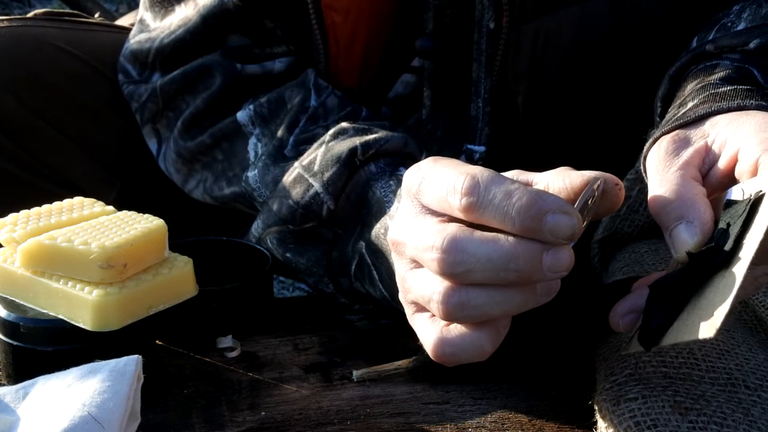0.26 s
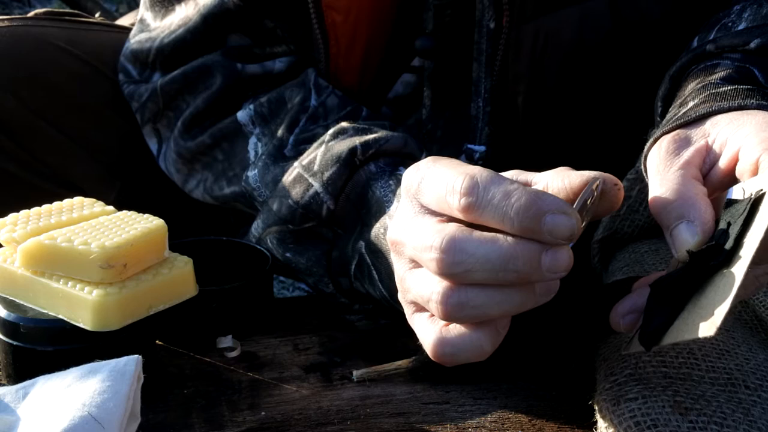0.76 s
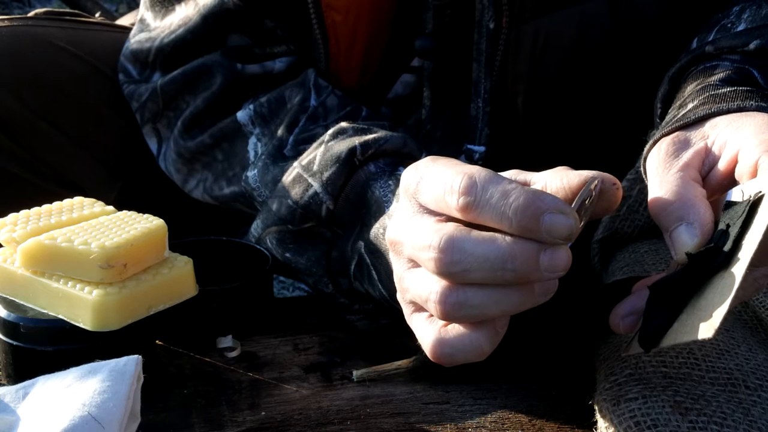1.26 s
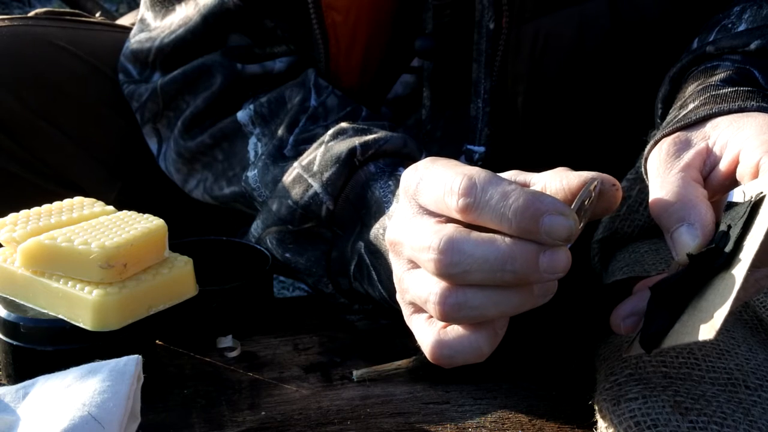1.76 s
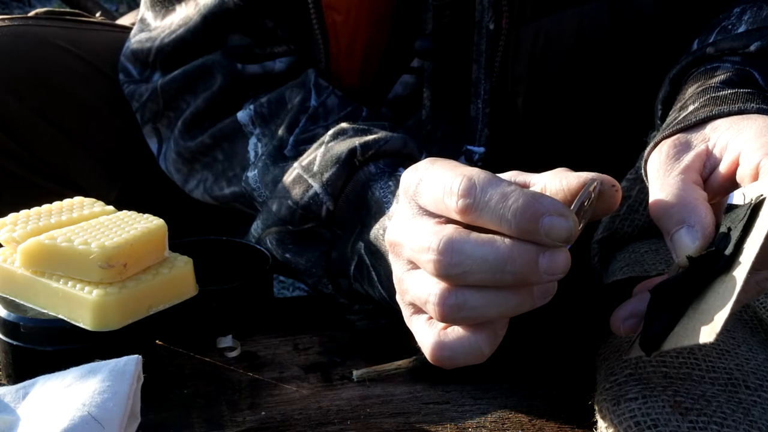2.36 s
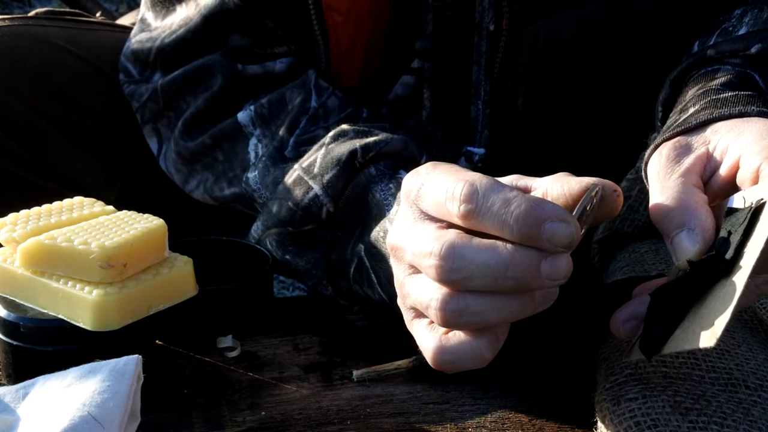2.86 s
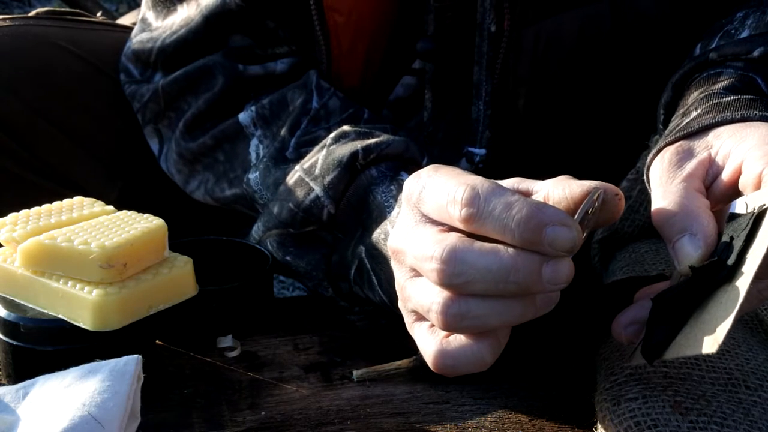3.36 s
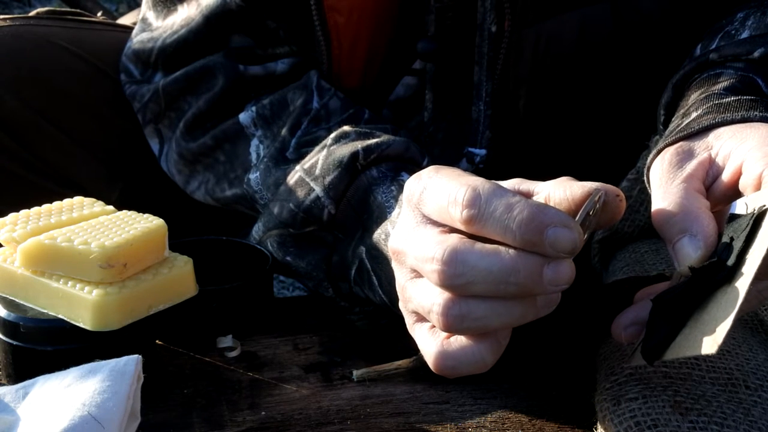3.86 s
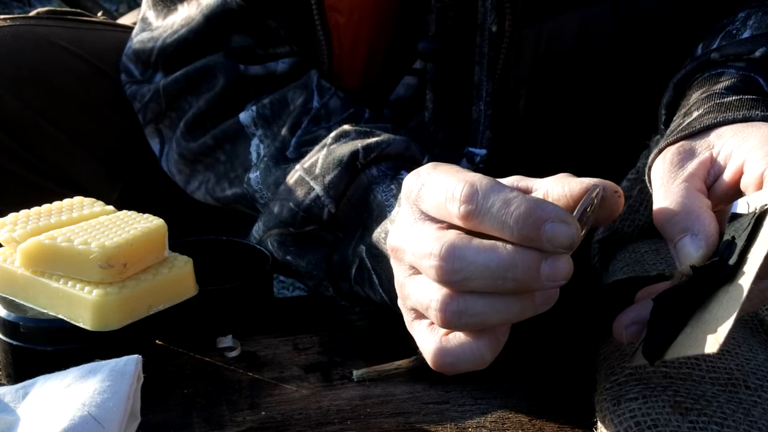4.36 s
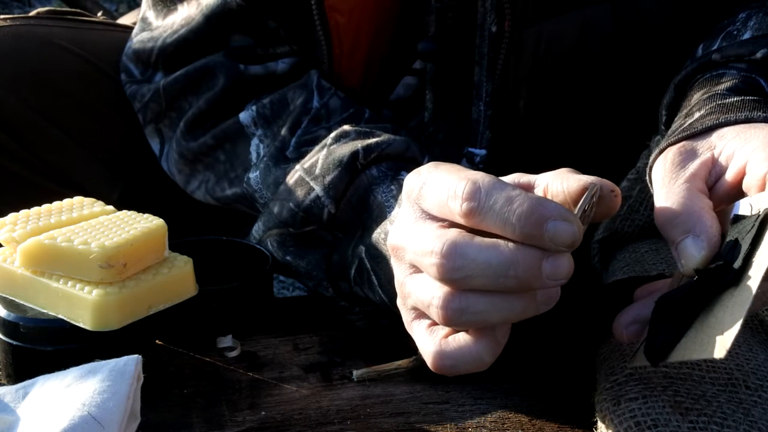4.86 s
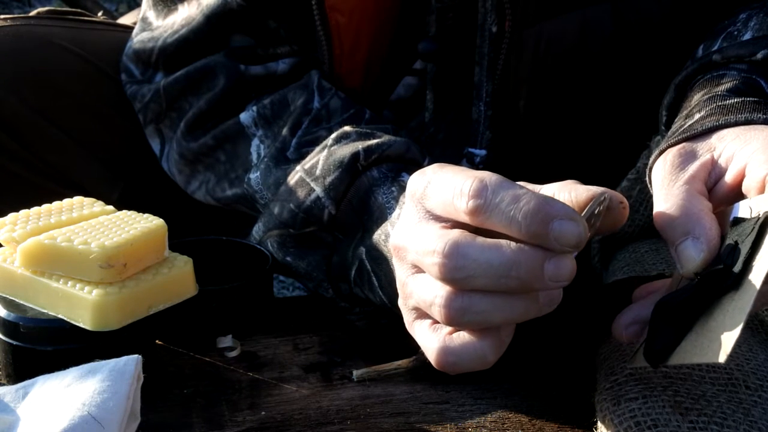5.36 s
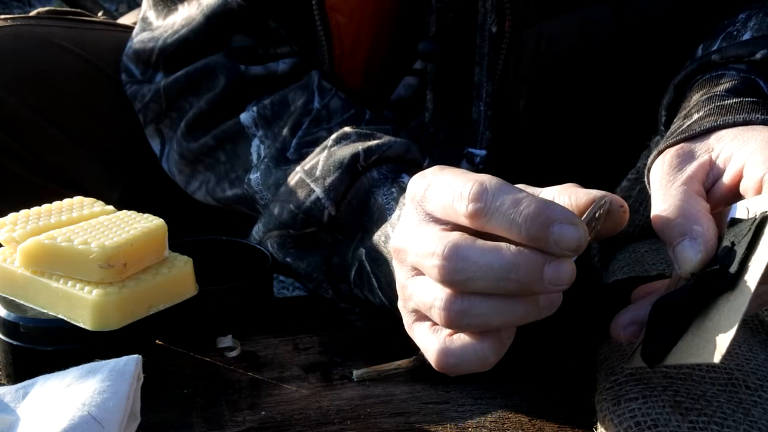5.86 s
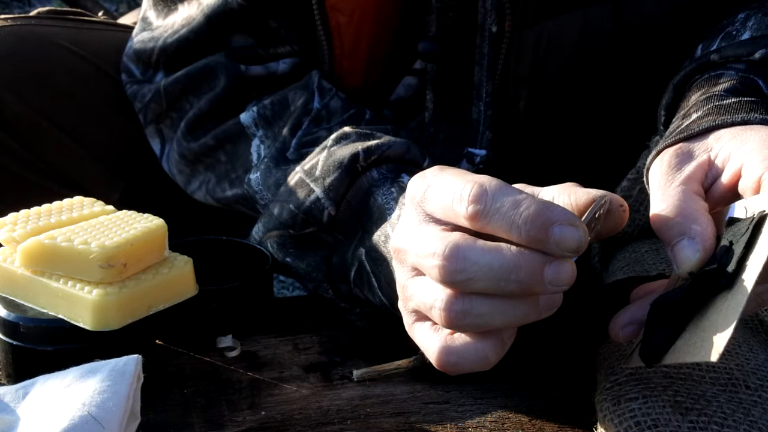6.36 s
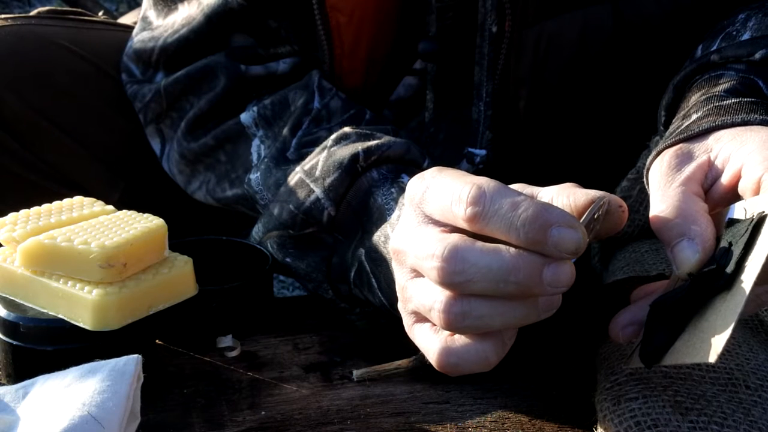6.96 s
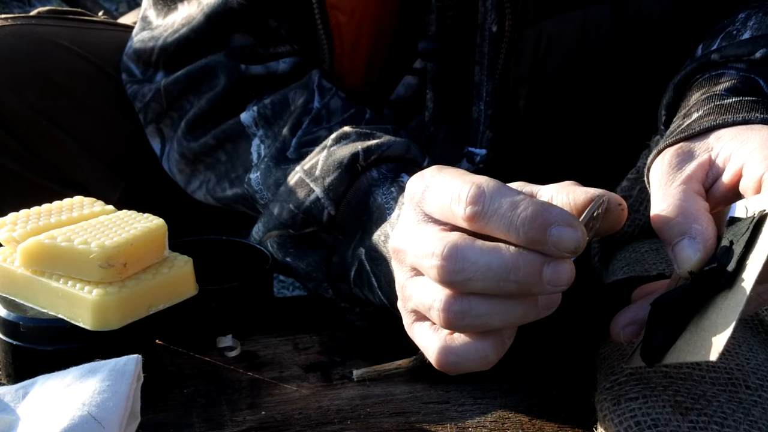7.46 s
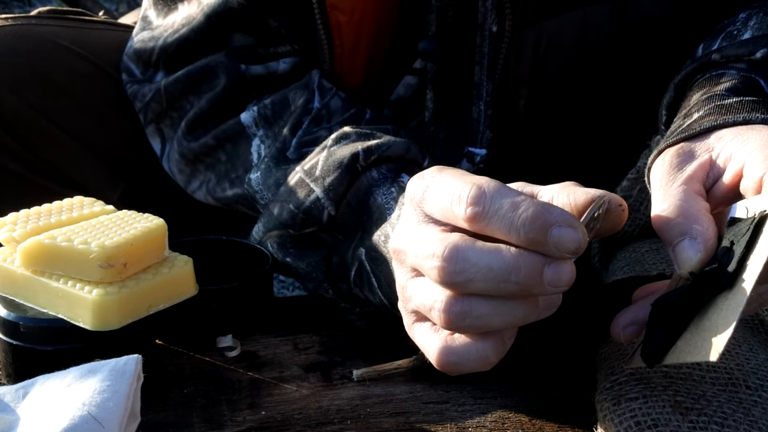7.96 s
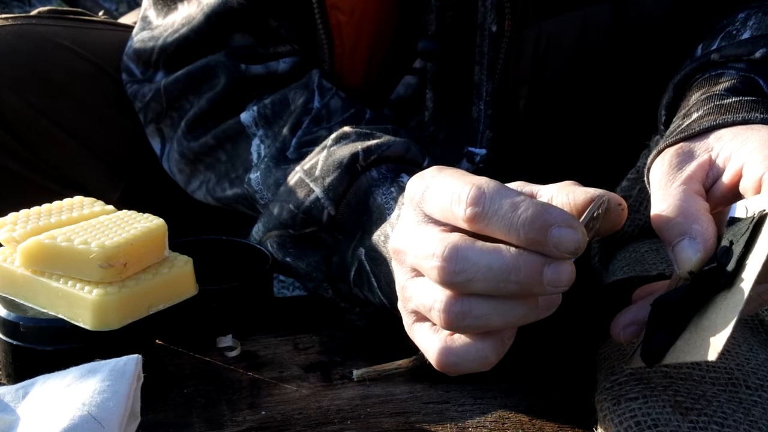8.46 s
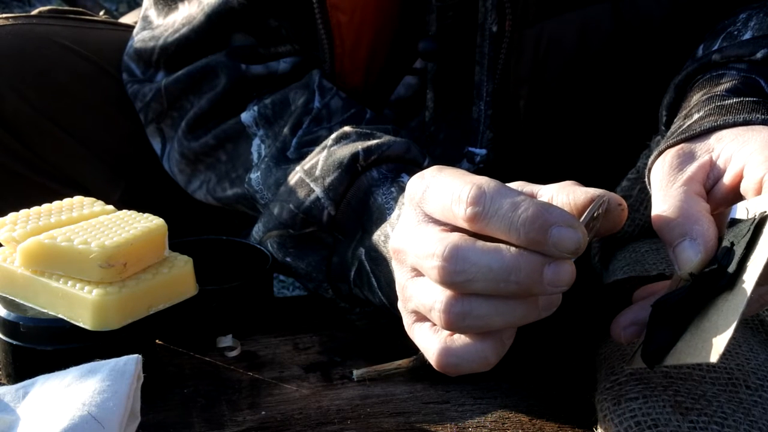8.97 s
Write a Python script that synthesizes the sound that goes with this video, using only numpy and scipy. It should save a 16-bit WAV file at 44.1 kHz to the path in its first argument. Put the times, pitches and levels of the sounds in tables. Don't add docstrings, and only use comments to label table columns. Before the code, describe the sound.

A wood fire outdoors snaps with sharp, scattered pops and tiny ticks over a low distant traffic rumble, with very faint bird calls.

```python
import sys
import numpy as np
from scipy import signal
from scipy.fft import rfft, irfft, next_fast_len
from scipy.io import wavfile
from scipy.ndimage import uniform_filter1d

SR = 44100
rng = np.random.default_rng(int(sys.argv[2]) if len(sys.argv) > 2 else 0)


def wav_record(signal):
    frames = np.transpose(np.atleast_2d(signal))
    bounded = np.clip(frames, -1, 1)
    quanta = np.round(bounded * 32767).astype(np.int16)
    wavfile.write(sys.argv[1], SR, quanta)


def field_ratio(decibels):
    return 10 ** (np.asarray(decibels, dtype=float) / 20)


N = 406161
TIME = np.arange(N) / SR
TOP_HZ = 15850


def unit(x):
    return x / np.sqrt(np.mean(x ** 2))


def peak(x, db):
    return field_ratio(db) * x / np.abs(x).max()


def shape(table, hz):
    f, db = np.transpose(table)
    return field_ratio(np.interp(np.log(hz + 1), np.log(f), db))


def ring(x, hz, width_hz):
    return signal.lfilter(*signal.iirpeak(hz, hz / width_hz, fs=SR), x)


def walk(rate):
    k = int(SR / rate)
    steps = np.repeat(rng.standard_normal(N // k + 1), k)
    return uniform_filter1d(uniform_filter1d(steps, k), k)[:N]


def add(out, s, x):
    i = int(s * SR)
    out[..., i:i + x.shape[-1]] += x[..., :out.shape[-1] - i]


def ports(x, pan_db):
    lag_s = .000034
    size = next_fast_len(len(x) + 16)
    hz = np.fft.rfftfreq(size, 1 / SR)
    late = irfft(rfft(x, size) * np.exp(-2j * np.pi * hz * lag_s), size)
    return np.array([x * field_ratio(pan_db / 2), late[:len(x)] * field_ratio(-pan_db / 2)])


# frequency in Hz, gain in dB.
YARD_COLOUR = [(2060, -38), (3500, 1.5), (5550, -6), (6650, -3), (8060, -1), (9780, 0.5), (13300, -4.5),
               (15500, -11)]


def pop(crack_db, crack_hz, log_db, tail_db):
    t = np.arange(next_fast_len(SR // 3)) / SR
    log_hz = 2850 * (crack_hz / 8950) ** 0.28
    snap = (t == 0) + .12 * rng.standard_normal(len(t)) * np.exp(-t / .0004)
    crack = ring(ring(snap, crack_hz, 4200.), crack_hz, 6000.)
    bark = ring(ring(snap, 7100.0, 1200.0), 5800.0, 2800.0)
    crack = peak(crack + 0.43 * bark, crack_db + 5.5)
    log = peak(ring(ring(snap, log_hz, 1670.0), log_hz, 1900.0), log_db + 1.0)
    out = ports(crack, -3.3)
    add(out, .0004, ports(log, -3.5))
    bounce = field_ratio(-18.) * out[:, :SR // 100]
    bounce = bounce + field_ratio(-8.) * ports(np.roll(log, 18)[:SR // 100], -2.5)
    add(out, .00123, bounce)
    hiss = rng.standard_normal((2, 2, len(t)))
    hz = np.fft.rfftfreq(len(t), 1 / SR) * (8800 / crack_hz) ** 0.51
    high = unit(irfft(rfft(hiss[0]) * shape(YARD_COLOUR, hz), len(t)))
    low = unit(ring(hiss[1], log_hz, 1860.0))
    high_decay = field_ratio(-29.0) * np.exp(-t / .005) + field_ratio(-27.5) * np.exp(-t / 0.028)
    low_decay = field_ratio(-13.5) * np.exp(-t / 0.0041) + field_ratio(-28.0) * np.exp(-t / 0.034)
    tail = field_ratio(crack_db) * high * high_decay + field_ratio(log_db) * low * low_decay
    onset = np.minimum(t / .001, 1)
    return out + field_ratio(tail_db) * onset * tail


# start in seconds, crack level in dB, crack
# frequency in Hz, log ring level in dB, scattered tail level in dB.
BURSTS = [(1.2009, 5.5, 8600, -9, 4), (1.3594, -13.5, 8800, -17.5, 1.5), (1.7375, 2.5, 8450, -7, 3.5),
          (2.8911, -1.5, 9400, -6.5, 1), (3.5416, -27, 8400, -30.5, 0), (4.024, -28.5, 8800, -37, -2),
          (4.3132, -21.5, 9200, -36, -26), (5.8331, 7.5, 9550, -6, 0), (6.388, -12.5, 7840, -19, -11),
          (6.3882, -21.5, 7000, -18, 9), (6.8985, -3.5, 7240, -4.5, -5), (8.904, -21, 7700, -28.5, -1.5)]
# start in seconds, crack level in dB,
# crack frequency in Hz, log ring level in dB.
SMALL_TICKS = [(0.3485, -25, 8950, -27.5), (0.9046, -39, 6910, -39), (1.738, -4.5, 7340, -22),
               (1.5776, -30, 10140, -41), (1.6402, -35, 9630, -43), (1.6599, -23, 8100, -29.5),
               (2.5467, -23, 9400, -25), (2.8617, -29, 7800, -46), (4.5317, -33, 8940, -50),
               (4.5571, -33, 8500, -33.5), (4.7194, -43, 8880, -47), (5.5118, -28, 9550, -35.5),
               (5.7647, -29.5, 8380, -29), (5.8759, -30, 9090, -48), (6.1894, -42, 9360, -49),
               (6.2031, -36, 8990, -41), (7.8228, -27.5, 9800, -27), (7.989, -35.5, 8490, -38),
               (8.0308, -44, 9730, -40), (8.4201, -25.5, 10100, -29.5), (8.5022, -50, 8300, -26.5),
               (8.5825, -26, 8800, -25.5), (9.0534, -36, 6800, -43)]


def fire():
    out = np.zeros((2, N))
    tick_tail_db = 3.5
    for s, *settings in BURSTS + [(*tick, tick_tail_db) for tick in SMALL_TICKS]:
        add(out, s, pop(*settings))
    return out


# start in seconds, level in dB, frequency in Hz.
LOG_KNOCKS = [
    (1.2, -7, 1300),
    (1.74, -18, 3500),
    (2.89, -11, 1730),
    (5.83, -17, 2150),
    (1.2, -31, 3450),
    (6.389, -4, 880),
    (6.389, -14, 320),
    (6.9, -5, 1160),
    (6.9, -9, 3600),
]


def knocks():
    out = np.zeros((2, N))
    t, starts = np.arange(SR // 30) / SR, np.array(BURSTS)[:, 0]
    for s, db, hz in LOG_KNOCKS:
        t60_s = 0.0053 * (hz / 1000) ** -1.04
        knock = -field_ratio(db) * np.sin(2 * np.pi * hz * t) * 1000 ** (-t / t60_s)
        burst_s = starts[np.abs(starts - s).argmin()]
        add(out, burst_s + 0.00029, ports(knock, -0.91))
    return out


# burst start in seconds, echo level in dB.
BRIGHT_ECHOES = [
    (1.7375, -16),
    (2.8909, -22),
    (5.8331, -14),
]


def wall():
    delay_s, spread_s, bright_hz = 0.0062, .0018, 11300.
    out, t = np.zeros((2, N)), np.arange(SR // 50) / SR
    for s, db in BRIGHT_ECHOES:
        bright = rng.standard_normal((2, len(t)))
        bright = ring(ring(bright, bright_hz, 3800.), bright_hz, 3800.)
        add(out, s, field_ratio(db) * np.exp(-((t - delay_s) / spread_s) ** 2) * unit(bright))
    return out


def housing(x):
    x = x - 0.8 * ring(x, 3900.0, 900.0)
    x = x - 0.37 * ring(x, 4940.0, 1830.0)
    return signal.sosfilt(signal.butter(4, 13600., fs=SR, output="sos"), x)


def motor(load_db):
    level = field_ratio(-45.5 + load_db + 1.04 * walk(7.0))
    hz = 111. + 1.12 * walk(4.0)
    return np.sqrt(2) * level * np.sin(2 * np.pi * np.cumsum(hz) / SR)


# time in seconds, heavy vehicle drawing near in dB, motor load in dB.
TRAFFIC = [(0, -2, 5), (1.3, -2.5, 3.5), (2.1, 0, -4.5), (2.8, -2, 4.5), (3.5, -1.5, -7), (4.2, -2.5, 0),
           (5.5, -2.5, -5), (6.1, -2.5, 5), (6.7, 0, 4), (7.2, 1.5, 4.5), (7.9, -1, -3.5), (8.6, 1.5, -10),
           (9.21, 2, 0.5)]
# frequency in Hz, density in dB per Hz.
ROAR_SPECTRUM = [(22, -49), (42, -15.5), (60, 0), (110, -0.5), (224, -2), (342, -12.5), (550, -4.5),
                 (800, -3), (1050, -5), (1460, -18.5), (2720, -32), (3950, -34), (8570, -37.5),
                 (15600, -50)]
# frequency in Hz, gain in dB.
STEREO_WIDTH = [(30, -30), (200, -19.5), (600, -17.5), (1200, -11), (2500, -2), (5000, 1.5), (16000, -1)]


def road():
    s, *columns = np.transpose(TRAFFIC)
    heavy, load = (np.interp(TIME, s, c) for c in columns)
    rumble, tyres, hiss = -0.47 + 0.3 * heavy, 1.68 + 0.12 * heavy, -3
    size = next_fast_len(N)
    hz = np.fft.rfftfreq(size, 1 / SR)
    mid, side = rfft(rng.standard_normal((2, size))) * shape(ROAR_SPECTRUM, hz) * (hz < TOP_HZ)
    side = side * shape(STEREO_WIDTH, hz)
    pair = np.array([mid + side, mid - side])
    octave, out = np.log2(hz + 1), 0
    for centre in np.arange(4, 15):
        band = np.cos(np.pi / 2 * np.clip(octave - centre, -1, 1)) ** 2
        if centre < 8.5:
            swell = rumble
        elif centre < 9.5:
            swell = heavy
        elif centre < 11.5:
            swell = tyres
        else:
            swell = hiss
        flicker = 0.56 * walk(2.473) + 1.42 * walk(14.0)
        out = out + field_ratio(swell + flicker) * irfft(pair * band, size)[:, :N]
    roar = field_ratio(-32.5) * unit(out) * field_ratio(np.array([[-.2], [.2]]))
    return roar + motor(load)


def tone(t0, t1, hz0, hz1, db, wobble, flutter):
    u = np.linspace(0, 1, int((t1 - t0) * SR))
    i = rng.integers(N // 2)
    hz = (hz0 + (hz1 - hz0) * u) * (1 + wobble[i:i + len(u)])
    swell = np.minimum(8 * u, 1) * np.sqrt(1 - u ** 2)
    return field_ratio(db + flutter[i:i + len(u)]) * swell * np.sin(2 * np.pi * np.cumsum(hz) / SR)


# start in seconds, end in seconds, first and last frequency in Hz, level in dB.
BIRD_CALLS = [(.5, .57, 8600, 8450, -65), (5.14, 5.17, 5400, 4800, -67), (5.3, 5.39, 7800, 6900, -70),
              (5.59, 5.635, 5700, 4400, -63), (5.97, 6.15, 5640, 5520, -64), (5.97, 6.11, 5350, 5200, -68),
              (6.242, 6.336, 7350, 7260, -67), (6.348, 6.37, 7440, 7460, -63),
              (6.29, 6.35, 3200, 3700, -67), (6.443, 6.53, 4140, 4100, -61), (8.25, 8.33, 4550, 4560, -66),
              (8.03, 8.1, 3700, 3650, -66), (8.46, 8.543, 3500, 3400, -61), (8.63, 8.724, 3530, 3240, -65),
              (9.07, 9.12, 3500, 3400, -64), (9.163, 9.21, 3400, 3370, -66)]


def birds():
    calls = np.zeros(N)
    for row in BIRD_CALLS:
        add(calls, row[0], tone(*row, .007 * walk(400.0), 3.0 * walk(90.0)))
    t = np.arange(SR // 5) / SR
    trees = rng.standard_normal(len(t)) * np.exp(-t / .035)
    blurred = signal.fftconvolve(calls, trees / np.linalg.norm(trees))[:N]
    return np.sqrt(2) * (calls + field_ratio(-5.) * blurred)


# start in seconds, end in seconds, frequency in Hz, level in dB.
GEAR_WHINES = [
    (4.394, 6.8, 426.3, -52),
    (6.4, 7.51, 520.4, -44.5),
]


def gears():
    out = np.zeros(N)
    for t0, t1, hz, db in GEAR_WHINES:
        add(out, t0, tone(t0, t1, hz, hz, db, 0.0088 * walk(30.0), 3.5 * walk(15.0)))
    return np.sqrt(2) * out


def scene():
    front = fire() + knocks() + wall()
    return housing(front) + road() + birds() + gears()


# start in seconds, drop in dB, recovery time in seconds.
GAIN_DROPS = [
    (0, -7, 0.29),
    (1.204, -7.5, 0.56),
    (1.742, -3.5, 0.19),
    (2.892, -3, 0.08),
    (5.834, -5.5, 0.2),
]


def gain_control(x):
    gain_db = np.zeros(N)
    for s, db, back_s in GAIN_DROPS:
        gain_db += db * (TIME >= s) * np.exp(-np.maximum(TIME - s, 0) / back_s)
    return x * field_ratio(uniform_filter1d(gain_db, size=90))


def top_cut(x):
    return signal.sosfilt(signal.butter(12, 16570, fs=SR, output="sos"), x)


def record(dry):
    clipped = np.clip(gain_control(dry), -1, 1)
    low_pass = signal.ellip(6, .1, 25, TOP_HZ + 200, fs=SR, output="sos")
    mix = signal.sosfiltfilt(low_pass, clipped)
    return top_cut(mix)


dry = scene()
out = record(dry)
wav_record(out)
```